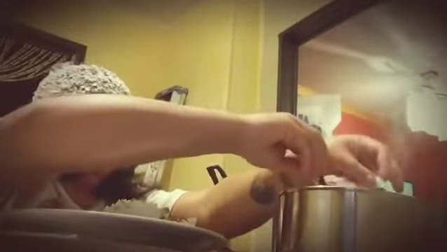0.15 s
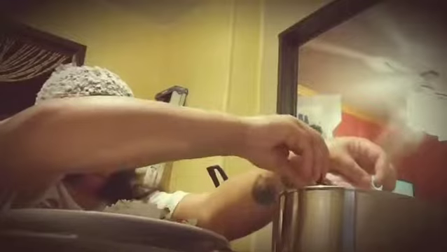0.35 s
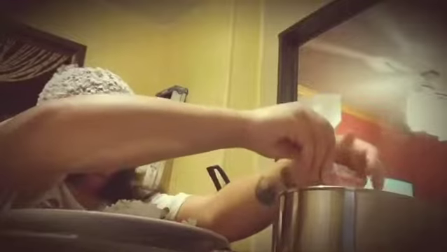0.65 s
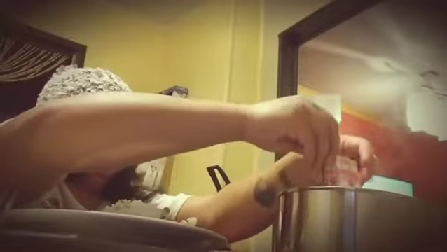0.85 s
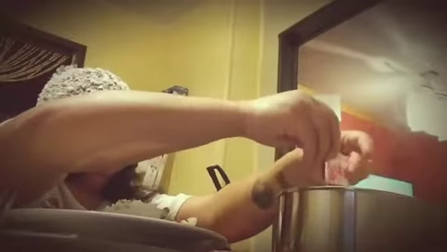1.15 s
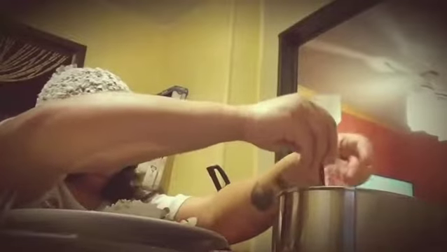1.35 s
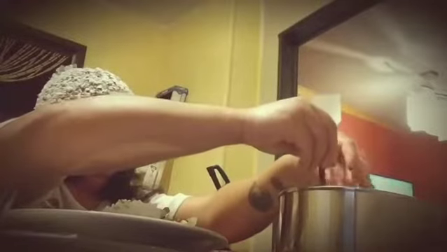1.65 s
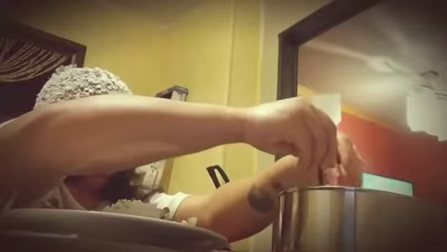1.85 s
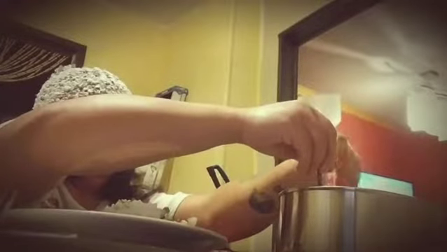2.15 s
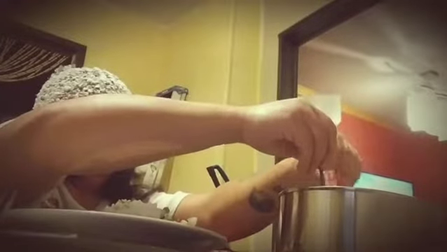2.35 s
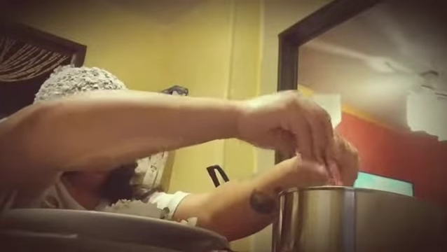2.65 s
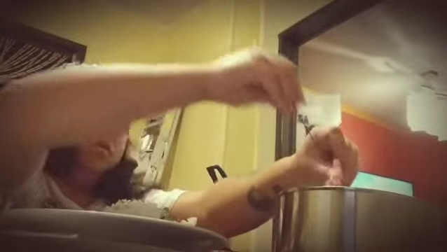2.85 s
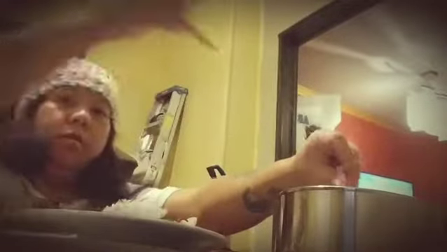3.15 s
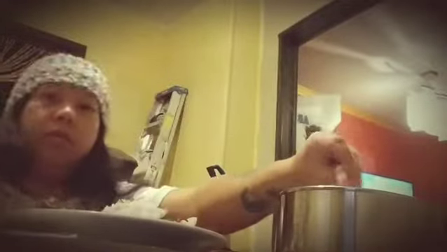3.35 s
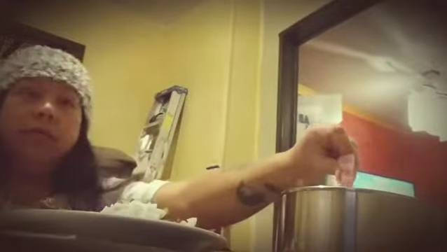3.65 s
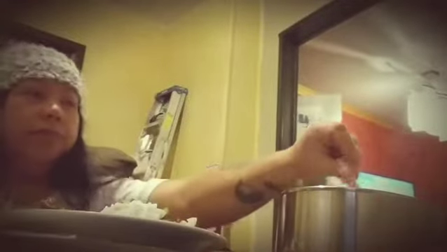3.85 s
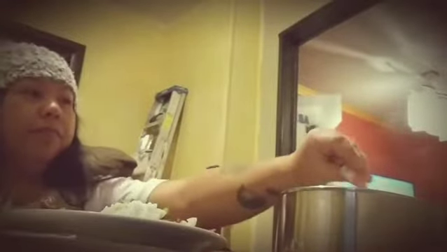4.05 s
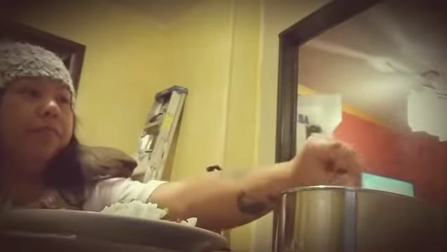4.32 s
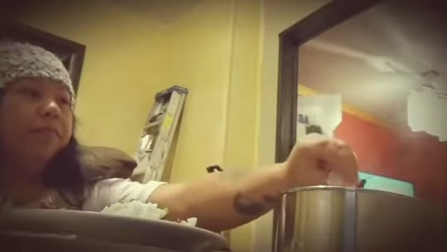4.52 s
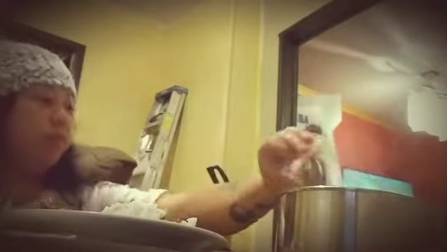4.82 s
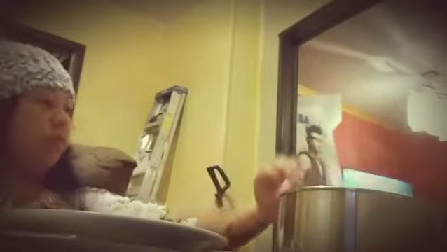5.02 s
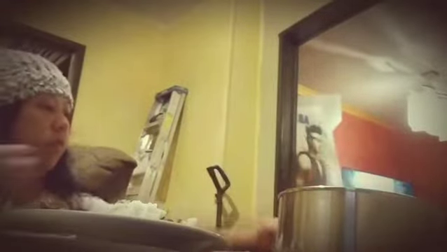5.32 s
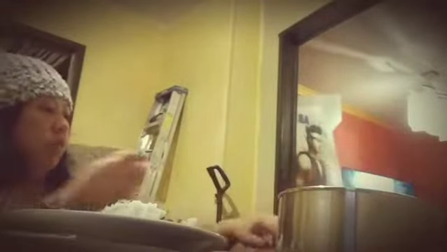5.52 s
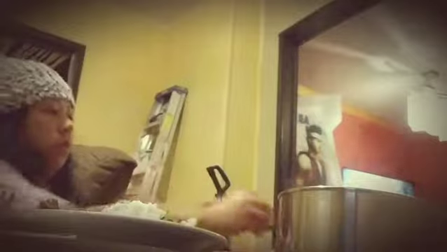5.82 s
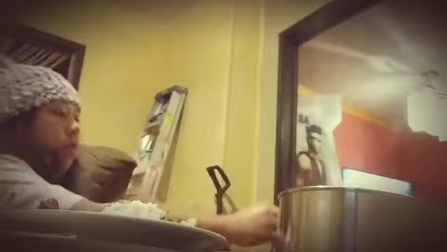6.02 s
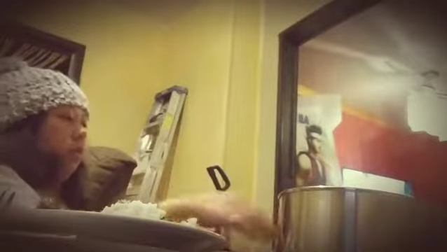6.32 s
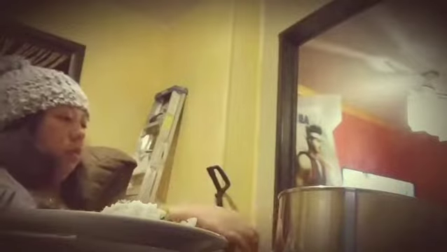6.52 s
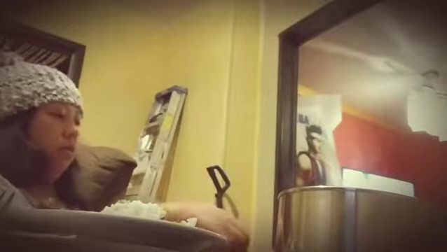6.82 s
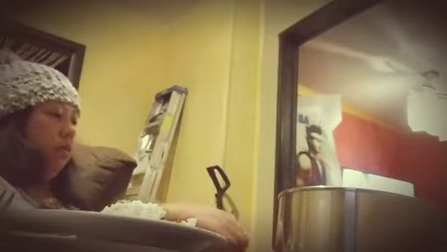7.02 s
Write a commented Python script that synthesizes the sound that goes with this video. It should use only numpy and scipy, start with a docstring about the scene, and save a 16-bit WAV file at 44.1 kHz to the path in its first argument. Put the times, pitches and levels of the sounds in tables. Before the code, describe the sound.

Scattered plastic crackles build into a dense run as hands wring out a packet in a kitchen, followed by soft table thuds.

```python
"""A kitchen: hands crinkle, tear and squeeze out a plastic noodle packet over a steel pot.
Creases snap singly or give way in crackling bursts; pot and packet ring hollowly, the walls answer.
Then a hand drops to the table with a few dull knocks that echo briefly off the walls.
Underneath: room air, a low hum, a shifting arm, a brushing sleeve and a few faint tones."""
import sys
import numpy as np
from scipy import signal
from scipy.fft import rfft, irfft, next_fast_len
from scipy.io import wavfile
from scipy.ndimage import uniform_filter1d, map_coordinates

SR = 44100
rng = np.random.default_rng(int(sys.argv[2]) if len(sys.argv) > 2 else 0)


def wav_record(signal):
    """Record a signal, one row per channel, as 16-bit PCM in the file named by sys.argv[1]."""
    frames = np.transpose(np.atleast_2d(signal))
    bounded = np.clip(frames, -1, 1)
    # unit amplitude maps onto the largest positive 16-bit level
    quanta = np.round(bounded * 32767).astype(np.int16)
    wavfile.write(sys.argv[1], SR, quanta)


N = 316188
TOP_HZ = 14900


def amp(db):
    return 10 ** (np.asarray(db) / 20)


def along(points, hz):
    """Interpolate (freq_hz, value) rows on a log axis."""
    freq_hz, values = np.transpose(points)
    return np.interp(np.log(hz + 1), np.log(freq_hz + 1), values)


def curve(rows):
    """Interpolate (time_s, value) rows per sample."""
    return np.interp(np.arange(N) / SR, *np.transpose(rows))


def wobble(rate_hz):
    """Smooth random curve."""
    knots = rng.standard_normal(int(N * rate_hz / SR) + 4)
    return map_coordinates(knots, [np.arange(N) * rate_hz / SR])


def swells(rows, edge_s):
    """Rise, hold and fall for each (start_s, length_s, level_db) row."""
    t, gain = np.arange(N) / SR, np.zeros(N)
    for start_s, length_s, level_db in rows:
        ramp = np.clip(np.minimum(t - start_s, start_s + length_s - t) / edge_s, 0, 1)
        gain += amp(level_db) * np.sin(np.pi / 2 * ramp) ** 2
    return gain


def filtered(x, response):
    size = next_fast_len(N + SR // 2)
    return irfft(rfft(x, size) * response(np.fft.rfftfreq(size, 1 / SR)), size)[..., :N]


def minimum_phase(gain):
    cepstrum = irfft(np.log(np.maximum(gain, 1e-6)))
    half = cepstrum.shape[-1] // 2
    cepstrum[..., 1:half] *= 2
    cepstrum[..., half + 1:] = 0
    return np.exp(rfft(cepstrum))


def add(track, start_s, sound):
    start = int(np.clip(round(start_s * SR), 0, N))
    track[..., start:start + sound.shape[-1]] += sound[..., :N - start]


def wavering_tone(rows, pitch_hz, drift, rate_hz, edge_s):
    """A sine that swells, wanders in pitch and level, and fades."""
    phase = 2 * np.pi * np.cumsum(pitch_hz * (1 + drift * wobble(rate_hz))) / SR
    return np.sqrt(2) * swells(rows, edge_s) * amp(1.3 * wobble(rate_hz)) * np.sin(phase)


# Left-right likeness: freq_hz, correlation
COHERENCE = [(100, 0.8), (300, 0.84), (1000, 0.27), (4000, 0.039)]
def noise(spectrum):
    """Unit-rms stereo noise, alike in the bass, unrelated in the treble."""
    def response(hz):
        angle = np.arccos(np.clip(along(COHERENCE, hz), -1, 1)) / 2
        return amp(along(spectrum, hz)) * [np.cos(angle), np.sin(angle)]
    mid, side = filtered(rng.standard_normal((2, N)), response)
    stereo = np.array([mid + side, mid - side])
    return stereo / np.sqrt(np.mean(stereo ** 2) + 1e-20)


# Room air: freq_hz, density_db
AIR_SPECTRUM = [(12, -48.5), (20, -3.5), (107, -25), (163, -11), (422, -61), (1330, -63.5), (1440, -46),
                (2140, -29.5), (2320, -40.5), (2600, -36.5), (6010, -36), (13900, -54), (16000, -63)]
def room_air():
    """Steady rumble and faint hiss."""
    return amp(-76) * noise(AIR_SPECTRUM)


# Hum colour: freq_hz, density_db
HUM_SPECTRUM = [(35, -23), (52, -2), (63, -12.5), (75, -5), (92, 1), (104, 1.5), (117, 0.5), (132, -7.5),
                (180, -36.5)]
# Hum envelope: time_s, level_db
HUM_LEVELS = [(0, -62), (2.3, -59.5), (3.3, -58.5), (4.2, -59), (5.6, -60), (6.5, -62), (7.17, -62)]
def room_hum():
    """A low noise band swells and sinks."""
    return amp(curve(HUM_LEVELS) - 0.5 * wobble(3.2)) * noise(HUM_SPECTRUM)


# Arm movement: time_s, relative_db
ARM_LEVELS = [(0.0, -76), (0.36, -74), (2.23, -69), (2.62, -66.5), (5.39, -61.5), (5.45, -58.5),
              (7.17, -63.5)]
# Table rumble: freq_hz, density_db
ARM_SPECTRUM = [(59, -25.5), (100, -2), (140, -2), (341, -9.5), (608, -25.5), (796, -26.5), (935, -27.5),
                (1220, -33.5), (1620, -32.5), (2500, -52), (3250, -78.5), (5500, -120)]
def arm_rumble():
    """An arm shifts on the table, which rumbles unevenly."""
    return amp(curve(ARM_LEVELS) + 2.5 + 2.5 * wobble(7)) * noise(ARM_SPECTRUM)


# Plastic film colour: freq_hz, density_db
FILM_SPECTRUM = [(100, -15), (300, -11.5), (700, -9), (1050, -9.5), (1380, -7.5), (1650, -10.5),
                 (2300, -3.5), (3300, -2), (5000, -1.5), (6200, -6.5), (7300, 0), (9300, -5), (12500, -1),
                 (14500, -5.5)]
def facet_pops(times_s, level_db, pitch_hz, body_db, ring_s, focus_db, width_oct, spread, size=512):
    """Film facets flip: a jolt and a brief flutter, strongest near each facet's pitch."""
    t, hz = np.arange(size) / SR, np.fft.rfftfreq(size, 1 / SR)
    since_flip_s = t - 20 / SR
    swing = np.exp(-np.abs(since_flip_s) / np.where(since_flip_s < 0, .00016, ring_s))
    swing += .05 * np.exp(-t / .002)
    flutter = rng.standard_normal((len(times_s), 3, size)) * swing  # shared, left, right
    jolt = flutter[:, :1] + 1.86 * (since_flip_s == 0)
    facet_db = focus_db * np.exp(-(np.log2((hz + 1) / pitch_hz[:, None]) / width_oct) ** 2 / 2)
    bass_db = body_db[:, None] / (1 + (hz / 2600) ** 4)  # large facets push more air
    gain = amp(along(FILM_SPECTRUM, hz) + facet_db + bass_db) / np.sqrt(1 + (hz / TOP_HZ) ** 20)
    waves = irfft(rfft(jolt + spread * flutter[:, 1:]) * minimum_phase(gain)[:, None])
    waves /= np.sqrt(np.sum(waves ** 2, axis=(1, 2), keepdims=True) / (2 * SR / 1000))  # rms over 1 ms
    waves *= amp(level_db)[:, None, None]
    starts = np.round(np.abs(times_s) * SR).astype(int)
    samples = (starts[:, None] + np.arange(size)).ravel()
    return np.array([np.bincount(samples, waves[:, side].ravel(), N)[:N] for side in range(2)])


def squeeze_sag_db(progress):
    """A squeeze is hardest near its middle."""
    return 4.5 * (2 * (progress - 0.49)) ** 2


# Finger squeezes and slides: start_s, length_s, relative_db, body_db
GRIPS = [(0.0, 0.18, -52.5, -16), (0.628, 0.033, -52.5, 15), (0.664, 0.035, -46.5, 4.5),
         (0.763, 0.11, -55, -4), (0.874, 0.031, -41, -12), (0.945, 0.087, -61, -19),
         (1.231, 0.037, -49, -3), (1.343, 0.085, -45.5, 1), (1.593, 0.27, -60, -4),
         (1.962, 0.024, -47.5, 2), (2.081, 0.13, -56, -5), (2.333, 0.05, -43.5, 9),
         (2.48, 0.041, -34.5, -1.5), (2.53, 0.16, -52, 16.5), (2.718, 0.029, -35.5, -10.5),
         (2.843, 0.051, -32.5, -2), (2.97, 0.053, -46, 4.5), (3.087, 0.063, -34, -3.5),
         (3.245, 0.068, -30, 1), (3.383, 0.05, -35, 2), (3.511, 0.048, -31.5, -3.5),
         (3.622, 0.056, -28, 3.5), (3.74, 0.115, -33, 0.5), (3.964, 0.058, -29.5, 2.5),
         (4.121, 0.082, -32.5, 0.5), (4.289, 0.09, -34.5, 3), (4.425, 0.088, -34.5, 0),
         (4.615, 0.11, -43.5, 6.5), (4.763, 0.072, -37, -1), (4.855, 0.066, -44.5, 7),
         (4.935, 0.066, -46, 19.5), (5.017, 0.13, -62.5, 27), (5.613, 0.06, -47.5, 4)]
def crackle(count=30):
    """Each squeeze flips a swarm of small facets of very uneven size."""
    start_s, length_s, grip_db, body_db = np.transpose(GRIPS)[:, :, None]
    progress = (np.arange(count) + rng.random((len(start_s), count))) / count
    scatter = rng.standard_normal((len(start_s), 4, count))
    spread_db = np.interp(grip_db, [-53, -44], [3, 7.5])  # harder grip, spikier burst
    sizes = amp(spread_db * np.minimum(scatter[:, 0], 1.5) - squeeze_sag_db(progress))
    sizes *= np.sqrt(np.abs(length_s) * 1000 / np.sum(sizes ** 2, axis=1, keepdims=True))
    sizes *= amp(np.interp(grip_db, [-52, -47], [-5, 0]))  # light touch, weaker pops
    times_s = start_s + length_s * progress
    level_db = grip_db + 20 * np.log10(sizes + 1e-9) - 6
    pitch_hz = 6200 * np.exp(0.32 * scatter[:, 1] + 0.22 * scatter[:, 2, :1])  # per facet, per grip
    facets = np.reshape([times_s, level_db, pitch_hz, body_db + 0.5 + 3 * scatter[:, 3]], (4, -1))
    return facet_pops(*facets, ring_s=.0004, focus_db=11.5, width_oct=0.11, spread=0.77)


def film_rub():
    """Film rubs on film in each squeeze; light touches slide more."""
    gain = np.zeros(N)
    for start_s, length_s, grip_db, _ in GRIPS:
        slide_db = np.interp(grip_db, [-51, -46], [-3, -19])
        progress = np.linspace(0, 1, round(length_s * SR))
        add(gain, start_s, amp(grip_db + slide_db - squeeze_sag_db(progress)))
    return uniform_filter1d(gain, size=350) * noise(FILM_SPECTRUM)


# Packet slips: start_s, level_db, fade_db_per_s
SLIPS = [(0, -60, 79), (0.883, -48, 500), (1.641, -57, 450), (2.14, -65.5, 50)]
# Packet cavity: freq_hz, density_db
CAVITY_SPECTRUM = [(700, -27), (1000, -8.5), (1280, -1.5), (1420, 0.5), (1600, -10), (2100, -26.5)]
def packet_slips(attack_s=0.0028):
    """Each slip starts quickly and fades, sounding the hollow inside."""
    gain = np.zeros(N)
    for start_s, level_db, fade_db_per_s in SLIPS:
        t = np.maximum(np.arange(N) / SR - start_s, 0)
        gain += amp(level_db - fade_db_per_s * t) * (1 - np.exp(-t / attack_s))
    return gain * noise(CAVITY_SPECTRUM)


# Pot and packet resonances: pitch_hz, width_hz, gain_db
HOLLOW_MODES = [(584, 88, -10.5), (740, 56, -4), (880, 180, -15.5), (1286, 38, -4.5), (1376, 25, 1.5),
                (4430, 36, -10.5), (4800, 130, -14)]
def hollow_ring(film):
    """The film excites the pot and the half-empty packet."""
    def response(hz):
        return sum(amp(gain_db) * 1j * hz * width_hz / (pitch_hz ** 2 - hz ** 2 + 1j * hz * width_hz)
                   for pitch_hz, width_hz, gain_db in HOLLOW_MODES)
    return filtered(film, response)


# Snapping creases: start_s, level_db, pitch_hz, body_db
CREASES = [(0.2165, -28.5, 8350, -0.5), (0.6639, -27.5, 7900, 0.5), (0.6802, -22.5, 8050, 6),
           (0.893, -26, 6900, 7), (1.2315, -33, 8900, -2), (1.3485, -34, 6000, 2), (1.3631, -26.5, 8400, 3),
           (1.41, -26.5, 6900, 0), (1.5991, -32.5, 8900, -8.5), (1.6254, -26.5, 9100, -8.5),
           (1.746, -42, 5900, 3), (1.962, -31, 8150, 5.5), (2.0265, -39, 7400, -3),
           (2.0752, -28, 6700, -8.5), (2.153, -30.5, 6300, -2.5), (2.204, -30.5, 8300, 1),
           (2.2197, -34, 4900, 4), (2.236, -31, 6700, 7.5), (2.2734, -27, 4170, 5.5),
           (2.327, -27, 5740, -10), (2.467, -44, 7000, 0), (2.495, -25, 9000, -4), (2.562, -39, 5500, 19),
           (2.621, -29.5, 5300, 11), (2.639, -29.5, 6740, 6), (2.666, -30, 5750, 4), (2.72, -23, 6700, 5.5),
           (2.7793, -35.5, 7200, -7), (2.874, -25, 6700, 3.5), (2.991, -25.5, 7140, -2.5),
           (3.036, -31.5, 8000, -7), (3.093, -18.5, 7400, -1), (3.15, -28.5, 6300, 6),
           (3.188, -29, 3700, 8), (3.244, -20, 5300, -0.5), (3.2682, -20, 5570, 0),
           (3.303, -29.5, 7060, -1.5), (3.4225, -18, 6650, 1), (3.4829, -33.5, 6600, 0),
           (3.5168, -26, 8800, -7), (3.543, -26, 7600, -12.5), (3.588, -32, 7400, 12.5),
           (3.6541, -14.5, 8250, -10.5), (3.7396, -28.5, 6100, 0), (3.773, -23, 5600, 2),
           (3.793, -19, 4100, -3), (3.8061, -18.5, 6000, -11), (3.8991, -33, 5000, 6),
           (3.941, -29, 6250, 10.5), (3.982, -18, 5740, 10), (3.9991, -21, 8800, -10),
           (4.1315, -27, 7300, -3), (4.1573, -21, 8100, 2.5), (4.21, -25.5, 6600, 1.5),
           (4.304, -24, 7300, -58), (4.356, -21.5, 6440, -8), (4.4652, -21, 8600, 1),
           (4.6247, -27.5, 8000, 0.5), (4.642, -25.5, 7140, -3), (4.661, -29, 8100, -6),
           (4.787, -34, 7200, -8), (4.803, -29.5, 6400, 13.5), (4.883, -33.5, 7600, 3),
           (4.953, -28.5, 6900, 4), (4.9805, -34.5, 6300, -12), (5.0525, -41, 4520, 15),
           (5.2277, -28.5, 8550, 0), (5.615, -44, 7000, 12)]
def crease_snaps():
    """A crease runs in three slips: a main one, with smaller ones just before and after."""
    start_s, crease_db, centre_hz, body_db = np.transpose(CREASES)[:, :, None]
    scatter = rng.standard_normal((len(start_s), 3, 3)) * [0, 1, 1]
    times_s = start_s + np.array([0, -.0011, .0014]) * np.exp(.5 * scatter[:, 0])
    shares = amp(np.array([0, -11, -10]) + 4.5 * scatter[:, 1])
    shares /= np.linalg.norm(shares, axis=1, keepdims=True)
    level_db = crease_db + 20 * np.log10(shares)
    pitch_hz = centre_hz * np.exp(0.052 * scatter[:, 2])
    facets = np.reshape(np.broadcast_arrays(times_s, level_db, pitch_hz, body_db - 1), (4, -1))
    return facet_pops(*facets, ring_s=.00042, focus_db=9.5, width_oct=0.53, spread=0.79)


def crease_ticks(count=70, span_s=(2.05, 5.1), peak_s=4.1, fall_db_per_s=4):
    """Small creases relax at random, loudest when the packet is wrung hardest."""
    times_s = np.interp(np.arange(count) + rng.random(count), [0, count], span_s)
    scatter = rng.standard_normal((count, 3))
    level_db = -42.5 - fall_db_per_s * np.abs(times_s - peak_s) + 3 * scatter[:, 0]
    pitch_hz = 5600 * np.exp(0.2 * scatter[:, 1])
    body_db = 3 + 4 * scatter[:, 2]
    return facet_pops(times_s, level_db, pitch_hz, body_db,
                      ring_s=.0004, focus_db=8, width_oct=0.27, spread=0.67)


# Drone spells: start_s, length_s, level_db
DRONE_SWELLS = [(2.62, .44, -67.5), (6.88, 0.31, -66)]
def drone():
    """A faint tone, roughened by fast pitch wander."""
    return wavering_tone(DRONE_SWELLS, pitch_hz=421, drift=0.19, rate_hz=61, edge_s=0.064)


# Press on the pot: start_s, length_s, level_db
POT_PRESS = [(4.39, 0.173, -48)]
def pot_boom():
    """The pot booms briefly as the hand presses on it."""
    return wavering_tone(POT_PRESS, pitch_hz=116.3, drift=.06, rate_hz=53, edge_s=0.026)


# Blows on the table: start_s, relative_db, echo_brightness_db
BLOWS = [(4.741, -63, -9), (5.34, -39.5, 3), (5.4154, -36, 2.5), (5.516, -42, -11), (6.377, -32, 3.5),
         (6.794, -63, -14.5)]
# Thud and its early room echoes: delay_s, pitch_hz, gain_db, t60_s
THUD_PARTS = [(0, 153, 1, 0.033), (0, 289, 2, 0.059), (0, 333, -24, 0.0083), (.0095, 154, -6.5, 0.047),
              (.011, 225, 10, 0.012), (.011, 1041, -12.5, 0.018), (.019, 660, -19, .07),
              (.02, 785, -21.5, 0.066), (.019, 1290, -21, 0.025)]
def table_knocks():
    """Soft blows thud in the table top and echo off the walls, brighter when harder."""
    track, t = np.zeros(N), np.arange(SR // 5) / SR
    cushion = 1 - np.exp(-t / 0.0014)  # flesh softens the attack
    for start_s, blow_db, echo_brightness_db in BLOWS:
        for delay_s, pitch_hz, gain_db, t60_s in THUD_PARTS:
            level_db = blow_db + gain_db + echo_brightness_db * (pitch_hz > 500) + rng.normal(1.5, 0.81)
            envelope = amp(level_db - 60 * t / t60_s) * cushion
            add(track, start_s + delay_s, envelope * np.sin(2 * np.pi * pitch_hz * t))
    return np.array([track, track])


# Squeak: start_s, length_s, level_db
SQUEAK_SWELL = [(6.13, 0.091, -75.5)]
def squeak():
    """One faint, thin, high tone."""
    return wavering_tone(SQUEAK_SWELL, pitch_hz=6300, drift=0.0029, rate_hz=110, edge_s=0.018)


# Sleeve strokes: start_s, length_s, level_db
SLEEVE_STROKES = [(6.335, .13, -57), (6.79, 0.25, -76)]
# Cloth friction: freq_hz, density_db
CLOTH_SPECTRUM = [(400, -4), (900, 3), (1400, -9), (2600, -5), (3400, -6), (3800, 0.5), (4300, -10),
                  (7500, -15), (10000, -39)]
def sleeve_brush():
    """A sleeve brushes the table."""
    return swells(SLEEVE_STROKES, edge_s=.06) * noise(CLOTH_SPECTRUM)


# Room decay: freq_hz, t60_s
KITCHEN_DECAY = [(200, 0.25), (1300, 0.27), (4000, 0.28), (8000, 0.23), (14000, 0.22)]
# First reflections: delay_s, gain_db
WALL_ECHOES = [(0.0124, -13), (0.014, -18.5), (.0185, -22.5), (0.0225, -21)]
def kitchen_reverb(x, tail_db, blocks=24):
    """Near walls, then a diffuse tail, redrawn per block as the hands move."""
    wet, step = np.zeros((2, N)), N // blocks + 1
    for start in range(0, N, step):
        hz, t, spectra = signal.stft(rng.standard_normal((2, SR // 2)), SR, nperseg=256)
        decay = amp(-60 * t / along(KITCHEN_DECAY, hz)[:, None])
        tail = signal.istft(spectra * decay, SR, nperseg=256)[1]
        tail *= np.interp(np.arange(tail.shape[1]) / SR, [.001, .003, .009, .016], [.24, .8, .13, .66])
        tail *= amp(tail_db) / np.linalg.norm(tail[0])
        for delay_s, gain_db in WALL_ECHOES:
            arrivals_s = delay_s + rng.normal(0, .0002, 2)
            tail[[0, 1], (arrivals_s * SR).astype(int)] += amp(gain_db)
        add(wet, start / SR, signal.fftconvolve(x[:, start:start + step], tail, axes=1))
    return wet


# Shading by the phone's body: freq_hz, left_minus_right_db
MIC_SHADING = [(200, 0), (1200, 3.5), (2400, 3.5), (4500, 2.5), (6500, 9), (9000, 0.5), (12000, 0),
               (15000, 1.5)]
def from_left(x, lag_s):
    """Sound reaches the left microphone first; the phone shades the right one."""
    side = np.array([[.5], [-.5]])
    def response(hz):
        return amp(side * along(MIC_SHADING, hz)) * np.exp(2j * np.pi * hz * side * lag_s)
    return filtered(x, response)


# Film's radiation into the room, lows favoured: freq_hz, gain_db
ROOM_SHARE = [(700, 2.5), (2500, 1.0), (6000, -2.0), (13000, -0.5)]
def scene():
    """Packet and table close by, a little to the left."""
    film = crease_snaps() + crackle() + film_rub() + crease_ticks()
    packet = film + hollow_ring(film) + packet_slips()
    knocks = table_knocks()
    room = filtered(kitchen_reverb(packet, tail_db=-7), lambda hz: amp(along(ROOM_SHARE, hz)))
    tones = pot_boom() + squeak() + drone()
    hands = from_left(packet + room + tones, lag_s=.0001714)
    table = from_left(knocks + kitchen_reverb(knocks, tail_db=-5), lag_s=.0001)
    background = room_air() + from_left(room_hum() + arm_rumble() + sleeve_brush(), lag_s=.00008)
    return hands + table + background


def record(dry):
    """Steep low-pass at the phone's band limit."""
    return filtered(dry, lambda hz: 1 / np.sqrt(1 + (hz / TOP_HZ) ** 80))


dry = scene()
out = record(dry)
wav_record(out)
```